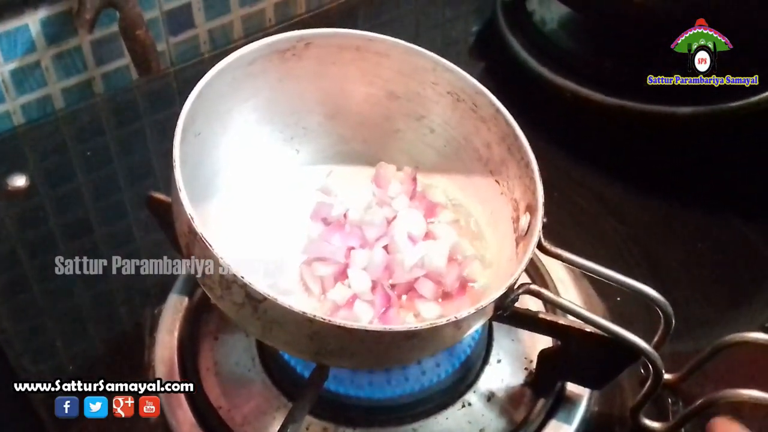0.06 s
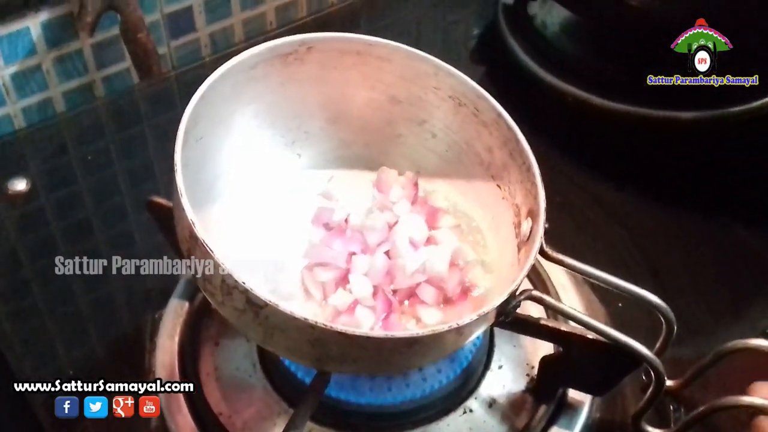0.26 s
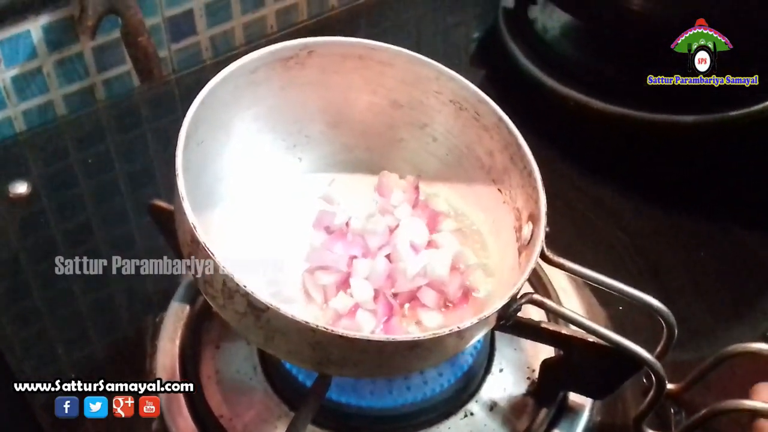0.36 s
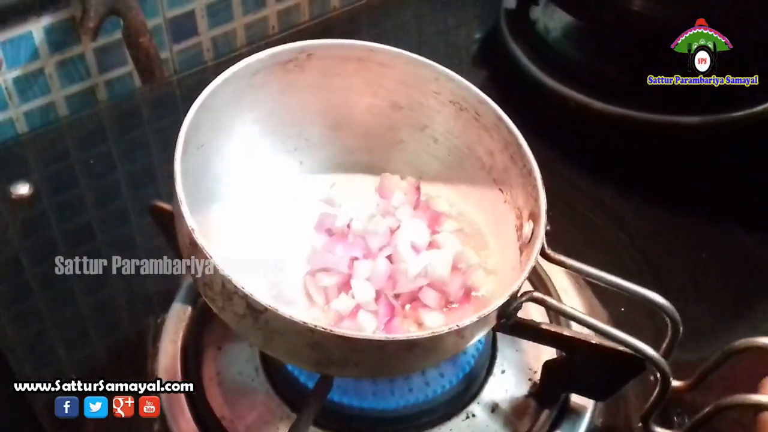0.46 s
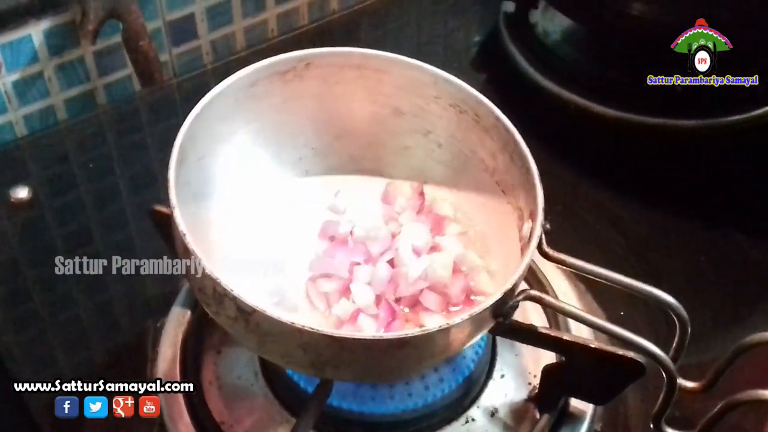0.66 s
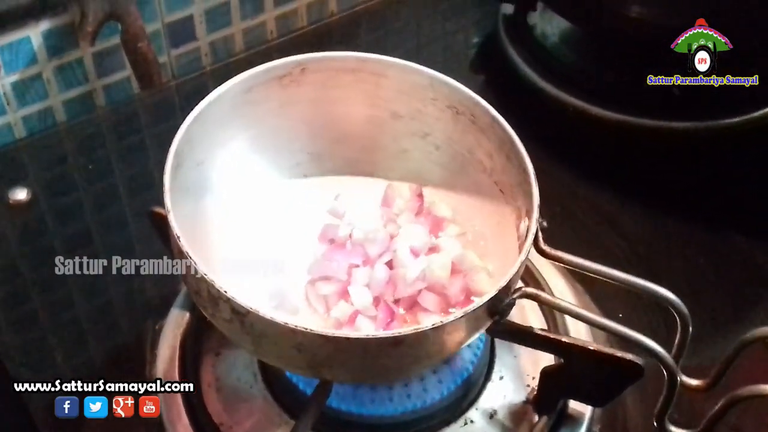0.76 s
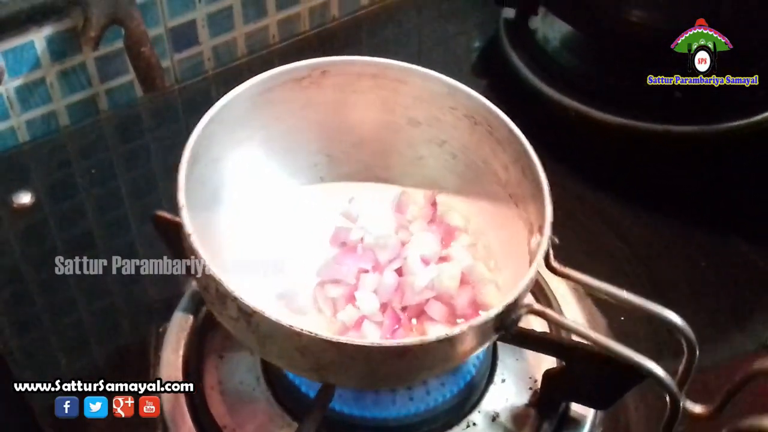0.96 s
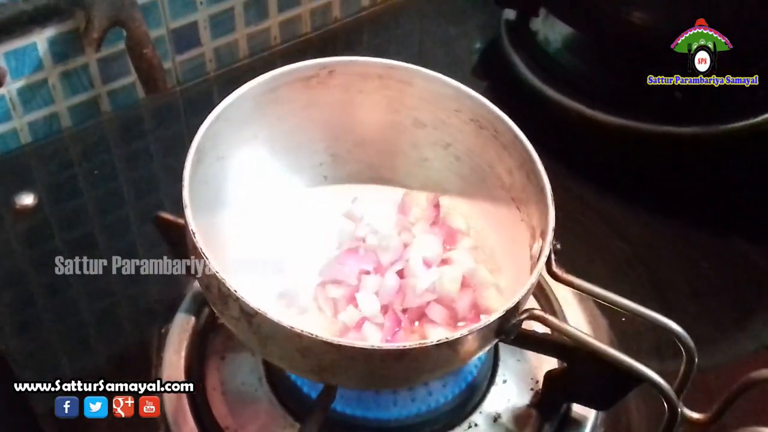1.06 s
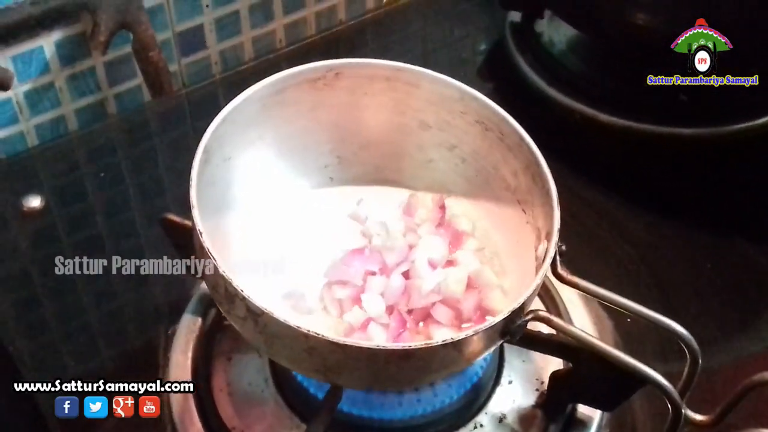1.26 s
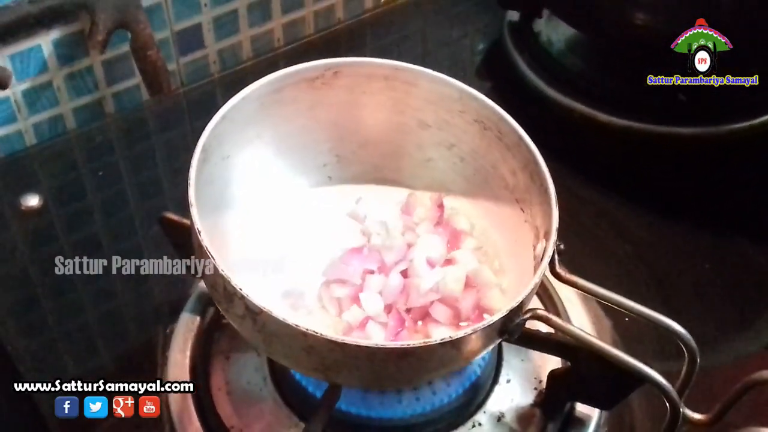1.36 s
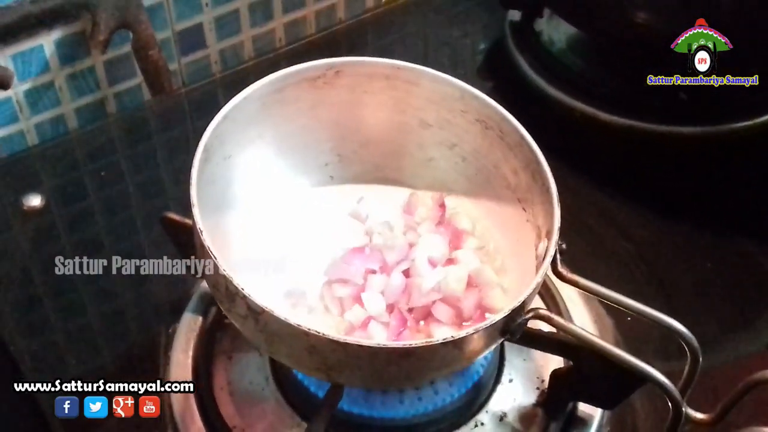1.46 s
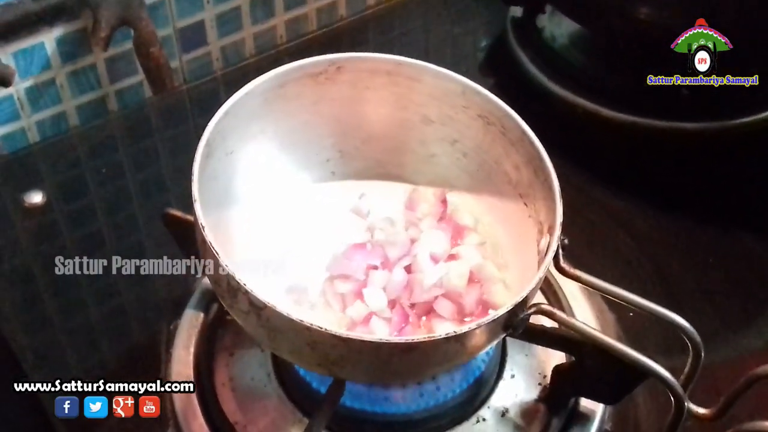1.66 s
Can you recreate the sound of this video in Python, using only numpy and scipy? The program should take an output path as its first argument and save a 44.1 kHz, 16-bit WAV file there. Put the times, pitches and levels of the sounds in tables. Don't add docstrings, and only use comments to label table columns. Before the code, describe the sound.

Close, bright frying of onions crackles and spits over a faint low gas burner; a short metal rattle is quickly damped, thin steel clinks, later a soft counter bump, in a lightly echoing kitchen.

```python
import sys
import numpy as np
from scipy import signal
from scipy.fft import rfft, irfft, next_fast_len
from scipy.io import wavfile
from scipy.ndimage import uniform_filter1d

SR = 44100
rng = np.random.default_rng(int(sys.argv[2]) if len(sys.argv) > 2 else 0)


def unload_wav(signal):
    wavfile.write(
        sys.argv[1],
        SR,
        np.round(np.clip(np.atleast_2d(signal).T, -1, 1) * 32767).astype(np.int16),
    )


def boost(x):
    u = np.asarray(x, float) / 20
    return 10 ** u


N = 74970


def rms_one(x):
    return x / np.sqrt(np.mean(x ** 2) + 1e-20)


def colour(x, spectrum, peaks=()):
    size = 2 * next_fast_len(N)
    hz = np.maximum(np.arange(size // 2 + 1) * SR / size, 1)
    at, level = np.transpose(spectrum)
    db = np.clip(np.interp(np.log(hz), np.log(at), level), -90, 0)
    for centre_hz, width_hz, lift_db in peaks:
        db = db + lift_db / (1 + (2 * (hz - centre_hz) / width_hz) ** 2)
    cepstrum = irfft(db * np.log(10) / 20, size)
    cepstrum[1:size // 2] *= 2
    cepstrum[size // 2 + 1:] = 0
    response = np.exp(rfft(cepstrum))
    return irfft(rfft(x, size) * response, size)[..., :N]


def drift(rate_hz):
    r = np.exp(-2 * np.pi * rate_hz / SR)
    wander = signal.lfilter([1], [1, -2 * r, r * r], rng.standard_normal(N + SR))
    return rms_one(wander[SR:])


def ring(clicks, hz, t60):
    r, w = boost(-60 / (t60 * SR)), 2 * np.pi * hz / SR
    return signal.lfilter([0, np.sin(w)], [1, -2 * r * np.cos(w), r * r], clicks + 1e-18)


def struck(hits, modes, uneven_db):
    s, db = np.transpose(hits)
    chance = rng.standard_normal((len(s), len(modes)))
    out = 0
    for k, (hz, level_db, t60) in enumerate(modes):
        clicks = np.zeros(N)
        clicks[(s * SR).astype(int)] = boost(db + level_db + uneven_db * chance[:, k])
        out = out + ring(clicks, hz, t60)
    return out


# f/Hz, level/dB [per Hz]
HUM_SPECTRUM = [(30, -10), (60, -6), (140, -0.5), (220, -8), (400, -31)]


def hum():
    return boost(-75.5) * rms_one(colour(rng.standard_normal(N), HUM_SPECTRUM))


# f/Hz, level/dB [per Hz]
SIDE_SPECTRUM = [(18, -80), (30, -36), (102, -12.5), (774, -6), (1830, -8), (2370, -10), (5300, -12),
                 (15000, -22.5)]


def side_hiss():
    side = boost(-73) * rms_one(colour(rng.standard_normal(N), SIDE_SPECTRUM))
    return side * [[1], [-1]]


KITCHEN_T60_S, WALL_CUT_HZ = 0.39, 4200


def kitchen(x):
    t = np.arange(SR // 2) / SR
    answer = rng.standard_normal(len(t)) * boost(-60 * t / KITCHEN_T60_S) * (t > .004)
    answer = signal.sosfilt(signal.butter(1, WALL_CUT_HZ, fs=SR, output="sos"), answer)
    return signal.fftconvolve(x, answer / np.sqrt(np.sum(answer ** 2)))[:N]


# f/Hz, level/dB [per Hz]
FLAME_SPECTRUM = [(150, -48.5), (250, -9.5), (546, -13.5), (722, -4), (864, -8.5), (1100, -6), (1430, -7),
                  (2420, -120)]


def flame():
    return boost(-62.5) * rms_one(colour(rng.standard_normal(N), FLAME_SPECTRUM + [(1500, -58.0)]))


LEAK_DB = -25
SHUDDER_S, SHUDDER_DB, SHUDDER_T60_S, SHUDDER_BAND_HZ = .266, -64.5, 0.51, (60, 192)


def shudder():
    t = np.arange(N) / SR - SHUDDER_S
    band = signal.butter(2, SHUDDER_BAND_HZ, "band", fs=SR, output="sos")
    low = rms_one(signal.sosfilt(band, rng.standard_normal(N)))
    return low * boost(SHUDDER_DB - LEAK_DB - 60 * np.maximum(t, 0) / SHUDDER_T60_S) * (t > 0)


# t/s, level/dB
BUMPS = [
    (1.0935, -42),
    (1.1030, -41),
    (1.1210, -48),
]
# f/Hz, level/dB, t60/s
COUNTER_MODES = [(277, -15, 0.1), (310, -5, 0.05), (534, -17, 0.18), (683, -3, 0.024), (978, -2.5, 0.075),
                 (1204, 3.5, 0.028)]


def counter_bumps():
    return struck(BUMPS, COUNTER_MODES, uneven_db=3.5)


# t/s, level/dB
KNOCKS = [
    (0.385, -35),
    (0.402, -41),
    (0.437, -33.5),
    (.444, -39.5),
    (.460, -41),
    (.497, -46),
]
# f/Hz, level/dB, t60/s
VESSEL_MODES = [(690, -9, .05), (725, -9, .07), (748, -9, .1), (783, -10, .1)]


def vessel_knocks():
    return uniform_filter1d(struck(KNOCKS, VESSEL_MODES, uneven_db=4.0), size=20)


# t/s, level/dB
CLINKS = [
    (0.384, -35),
    (0.398, -37),
]
# f/Hz, level/dB, t60/s
STEEL_MODES = [(1020, -10, 0.061), (1787, -10, 0.088), (2400, 0.5, 0.078), (2910, -13.5, 0.55),
               (3505, -13, 0.35), (3550, -2, 0.3)]


def steel_clinks():
    return struck(CLINKS, STEEL_MODES, uneven_db=1.0)


def grip():
    start_s, takes_s, damping_db = .334, 0.004, -18
    return boost(damping_db * np.clip((np.arange(N) / SR - start_s) / takes_s, 0, 1))


# t/s, level/dB
RATTLE = [
    (0.2646, -20.5),
    (0.2690, -28.5),
    (0.2762, -26),
    (0.2900, -39),
    (0.2955, -30),
    (0.3020, -35.5),
    (0.3065, -28),
    (0.3125, -34),
    (0.3205, -40.5),
    (0.3285, -31.5),
]
# f/Hz, level/dB, t60/s
DISH_MODES = [(274, -25, 0.034), (580, -13.5, 0.07), (780, -9, 0.036), (935, -12, 0.025), (1058, -9, 0.036),
              (1267, -16.5, 0.16), (1725, -7.5, 0.027), (2340, -14, 0.046), (2850, -20, 0.046),
              (3800, -13, 0.067), (4655, -12, 0.055), (4955, -13, 0.046), (5690, -17, 0.025)]


def dish_rattle():
    return struck(RATTLE, DISH_MODES, uneven_db=4.5)


# t/s, level/dB
NOTE_FEEDS = [
    (0.2672, -31.5),
    (0.267, -28),
    (0.275, -31.5),
    (0.291, -34),
    (0.3067, -27.5),
    (0.314, -40),
    (.3195, -29.5),
    (0.328, -27),
]
NOTE_HZ, NOTE_T60_S = 2226, 0.064


def dish_note():
    s, db = np.transpose(NOTE_FEEDS)
    feeds = np.zeros(N)
    feeds[(s * SR).astype(int)] = boost(db)
    swing = signal.lfilter([1], [1, -boost(-60 / (NOTE_T60_S * SR))], feeds + 1e-18)
    return uniform_filter1d(swing, size=40) * np.sin(2 * np.pi * NOTE_HZ * np.arange(N) / SR)


# t/s, level/dB
CHATTER = [
    (0.265, -19.5),
    (0.276, -25),
    (0.287, -31.5),
    (0.305, -26.5),
    (0.329, -31),
    (0.365, -36.5),
    (0.395, -37.5),
    (0.46, -46),
    (0.55, -54),
]
# f/Hz, level/dB [per Hz]
CHATTER_COLOUR = [(50, -9), (272, -13.5), (1200, -11.5), (1450, -18.5), (2100, -5.5), (4600, -10.5),
                  (6500, -21.5), (15000, -58)]
CHATTER_PER_S, CHATTER_DB = 3000, -4.5
CHATTER_WIDTH_HZ, CHATTER_LIFT_DB = 160, 6


def chatter():
    s, db = np.transpose(CHATTER)
    born = rng.random(N) < CHATTER_PER_S / SR
    contacts = boost(4.2 * np.minimum(rng.exponential(1, N), 3)) * rng.choice([-1, 1], N) * born
    t = np.arange(N) / SR
    level_db = CHATTER_DB + np.interp(t, s, db) - 23 * np.maximum(t - s[-1], 0)
    level = boost(level_db) * (t > s[0])
    lifts = [(hz, CHATTER_WIDTH_HZ, CHATTER_LIFT_DB) for hz, _, _ in DISH_MODES]
    return colour(contacts * level, CHATTER_COLOUR, lifts) / np.std(colour(contacts, CHATTER_COLOUR, lifts))


# t/s, level/dB [peak], f/Hz
TICKS = [(0.2174, -62, 11100), (0.23, -58, 12700), (0.2484, -56, 11400), (0.263, -56, 10800),
         (0.2963, -51, 11300), (0.6746, -53, 13200), (0.8073, -56.5, 11500), (0.83, -57, 11800),
         (0.8714, -60, 13100), (0.9043, -68, 11000), (1.1109, -54, 13700), (1.1096, -52, 13700),
         (1.1434, -55, 13000), (1.1747, -53, 13000), (1.2496, -58, 12800), (1.264, -50, 13200),
         (1.295, -61, 11500), (1.3159, -54, 11800), (1.4002, -52, 12900), (1.4232, -54, 13000),
         (1.4945, -55, 11500)]
# t/s, level/dB [peak], f/Hz
DROPS = [
    (1.48, -48.5, 7500),
    (1.4845, -54, 7600),
    (1.490, -58, 7300),
    (1.569, -52, 6850),
    (1.572, -51.5, 6200),
]
TICK_CYCLES, TICK_DB = 45, 10.5


def ticks():
    out, t = np.zeros(N + SR), np.arange(600) / SR
    for s, db, hz in TICKS + DROPS:
        i = int((s + 0.00058) * SR)
        fall = boost(db + TICK_DB - 60 * t * hz / TICK_CYCLES)
        out[i:i + len(t)] += fall * np.sin(2 * np.pi * hz * t) * np.minimum(t * 3000, 1)
    return out[:N]


# f/Hz, level/dB [per Hz]
BURST_COLOUR = [(410, -47.5), (700, -21.5), (1560, -12.5), (2370, -2.5), (3550, -3.5), (6740, -15.5),
                (8990, -34), (13300, -32.5), (16000, -34)]
# f/Hz, width/Hz, lift level/dB
PAN_RESONANCES = [(1252, 204, 14.5), (1659.6, 49, 11), (2320, 280, 6.5), (3000, 920, 0), (3516, 60, 8.5),
                  (4010, 240, 5), (4620, 850, 6), (11500, 1100, 9.5), (13200, 730, 7)]


def pan(x):
    return colour(x, BURST_COLOUR, PAN_RESONANCES)


# f/Hz, level/dB, t60/s
SPIT_RINGS = [(1150, -17, .015), (2100, -7, .018), (2440, -4, .022), (3200, -15, .012), (4000, -7, .04)]
SPIT_S, SPIT_DB, SPIT_SNAP_DB = 1.1120, -17, -16.5
SPIT_LASTS_S, SPIT_DIES_DB_PER_S = .0035, 9000


def spit():
    after_s = np.clip(np.arange(N) / SR - SPIT_S - SPIT_LASTS_S, 0, .1)
    return boost(-SPIT_DIES_DB_PER_S * after_s) * struck([(SPIT_S, SPIT_DB)], SPIT_RINGS, uneven_db=0)


# t/s, level/dB [peak], f/Hz
POPS = [(0.0019, -28.5, 3580), (0.0128, -33.3, 3620), (0.028, -34.8, 4650), (0.0723, -29, 4220),
        (0.0819, -41, 2390), (0.0956, -44, 3100), (0.1135, -41, 4090), (0.1208, -39, 4230),
        (0.1461, -37, 2130), (0.1545, -44, 2190), (0.179, -49, 2400), (0.2317, -26, 4200),
        (0.2416, -28, 2350), (0.5315, -29.5, 2400), (0.5755, -34.1, 4080), (0.5971, -26.5, 3960),
        (0.6387, -31.5, 4000), (0.6466, -32.6, 3100), (0.6746, -35.3, 3700), (0.6954, -35, 2500),
        (0.7235, -31, 4540), (0.7858, -28.5, 4000), (0.7947, -32, 3570), (0.81, -29.5, 3620),
        (0.864, -28.5, 4200), (0.8733, -29, 3570), (0.88, -40, 2690), (0.9056, -32, 3550),
        (0.916, -37, 2410), (0.9254, -40, 2350), (0.9321, -31.5, 3430), (0.9496, -31, 4600),
        (0.9822, -24.5, 2530), (1.0017, -30, 3550), (1.0112, -29.5, 2380), (1.0262, -37, 3800),
        (1.082, -31.5, 2350), (1.1203, -31, 3030), (1.1337, -36, 4650), (1.1464, -42, 2170),
        (1.152, -44, 2480), (1.1758, -29, 2270), (1.2054, -45, 2220), (1.2155, -39, 4670),
        (1.2507, -25.5, 4370), (1.2641, -29, 2230), (1.274, -27, 3600), (1.2959, -32, 4600),
        (1.317, -24.5, 4660), (1.3265, -25, 3550), (1.3806, -29.5, 2360), (1.4016, -30, 4240),
        (1.4109, -27, 2430), (1.425, -29, 2360), (1.4811, -39, 4670), (1.4904, -43, 2380),
        (1.5332, -40, 2150), (1.5722, -34.5, 3550), (1.6014, -34, 3750), (1.6695, -36, 3680)]
POP_CYCLES, POP_DB = 30, -5
SNAP_DB, SNAP_UNEVEN_DB = -5, 1.5
SPRAY_T60_S, SPRAY_DB = 0.02, -16


def pops():
    rings, snaps, t = np.zeros(N + SR), np.zeros(N + SR), np.arange(2000) / SR
    for s, db, hz in POPS + [(SPIT_S, SPIT_DB + SPIT_SNAP_DB, 2400)]:
        i = int(s * SR)
        rings[i:i + len(t)] += boost(db + POP_DB - 60 * t * hz / POP_CYCLES) * np.sin(2 * np.pi * hz * t)
        snap = rng.standard_normal(len(t)) * boost(SPRAY_DB - 60 * t / SPRAY_T60_S)
        snap[0] = 1
        uneven_db = SNAP_UNEVEN_DB * np.tanh(rng.standard_normal())
        snaps[i:i + len(t)] += boost(db + SNAP_DB + uneven_db) * snap
    unit = pan(np.arange(N) == 0)
    return rings[:N] + pan(snaps[:N]) / np.abs(unit).max() + spit()


# t/s, level/dB
HEAT = [(0, -46.5), (.2, -47), (.45, -46), (.6, -46.5), (.645, -43), (.69, -48.5), (1.099, -47),
        (1.125, -42), (1.17, -48), (1.45, -47), (1.7, -48)]
BURSTS_PER_S, BURST_SPREAD_DB, CLUMP_DB, HISS_DB = 2700, 0.5, 2, -2.5
MIST_PER_S, MIST_SPREAD_DB, MIST_SWAY_DB, MIST_HZ = 1100, 3.0, 1.1, 9600
MIST_FOLLOWS = 0.27


def crackle(per_s, spread_db):
    sizes = np.minimum(rng.exponential(1, N), 5) * spread_db
    return boost(sizes) * rng.choice([-1, 1], N) * (rng.random(N) < per_s / SR)


def sizzle():
    clumps = boost(CLUMP_DB * (drift(52) + 0.81 * drift(5.9)))
    bursts = rms_one(crackle(BURSTS_PER_S, BURST_SPREAD_DB) * clumps)
    bursts = bursts + boost(HISS_DB) * rng.standard_normal(N)
    mist = rms_one(crackle(MIST_PER_S, MIST_SPREAD_DB)) + boost(-4.5) * rng.standard_normal(N)
    mist = mist * boost(MIST_SWAY_DB * (drift(22) + .5 * drift(30)))
    low = signal.sosfilt(signal.butter(4, MIST_HZ, "low", fs=SR, output="sos"), bursts)
    high = signal.sosfilt(signal.butter(4, MIST_HZ, "high", fs=SR, output="sos"), mist)
    s, db = np.transpose(HEAT)
    heat_db = np.interp(np.arange(N) / SR, s, db)
    high = high * boost(MIST_FOLLOWS * (heat_db - heat_db.mean()))
    return rms_one(pan(low + high)) * boost(heat_db)


def scene():
    hits = grip() * dish_rattle() + steel_clinks() + vessel_knocks() + counter_bumps()
    clatter = signal.sosfilt(signal.butter(4, 6500, fs=SR, output="sos"), hits)
    popping, note = pops(), dish_note()
    mid = flame() + shudder() + clatter + grip() * note + chatter() + ticks() + popping + sizzle()
    mid = mid + boost(-8.5) * kitchen(clatter + boost(-5.5) * popping) + boost(-18) * kitchen(note)
    return np.array([mid, mid])


def top_cut(x):
    return signal.sosfilt(signal.butter(12, 16250, fs=SR, output="sos"), x)


def record(dry):
    low_cut = signal.butter(10, 259.4, "high", fs=SR, output="sos")
    heard = signal.sosfilt(low_cut, dry) + boost(LEAK_DB) * dry
    heard = heard + hum() + side_hiss()
    heard = signal.sosfilt(signal.cheby2(16, 60, 15900, fs=SR, output="sos"), heard)
    return top_cut(heard - .0007)


dry = scene()
out = record(dry)
unload_wav(out)
```